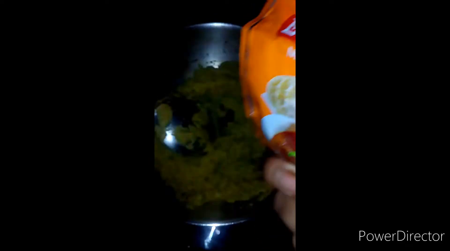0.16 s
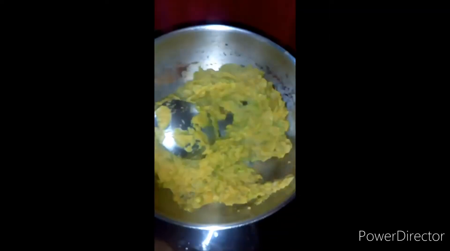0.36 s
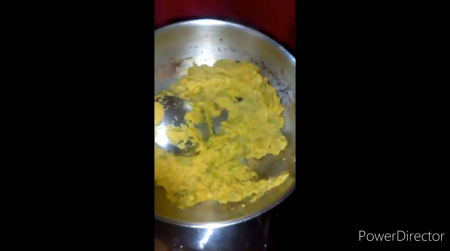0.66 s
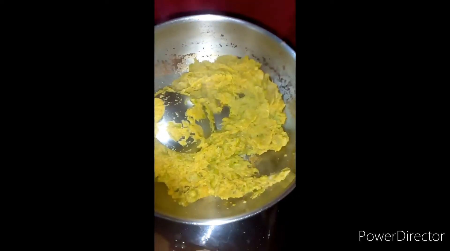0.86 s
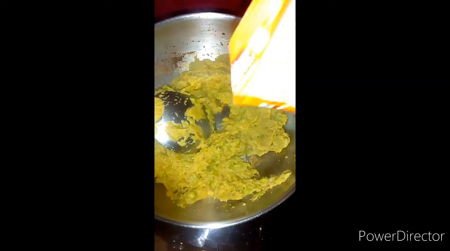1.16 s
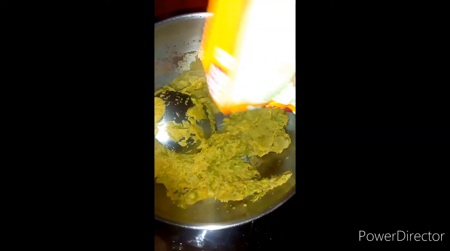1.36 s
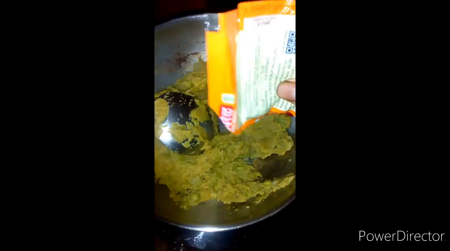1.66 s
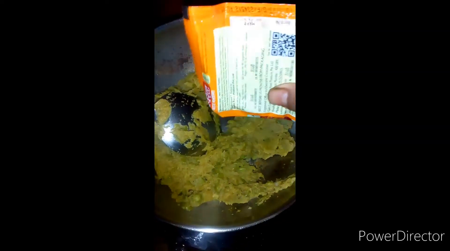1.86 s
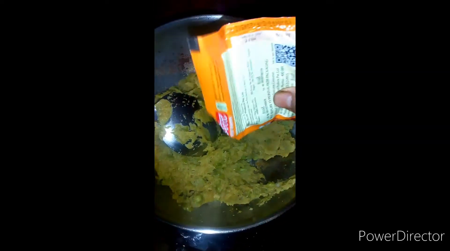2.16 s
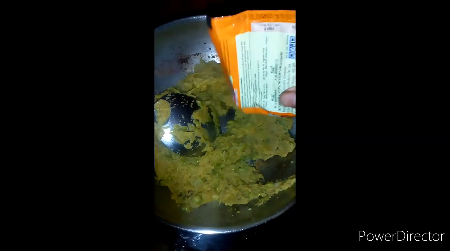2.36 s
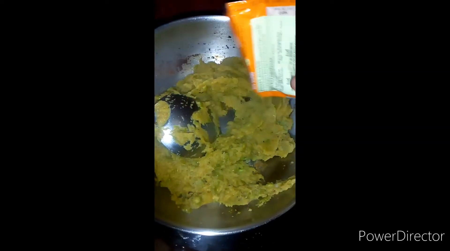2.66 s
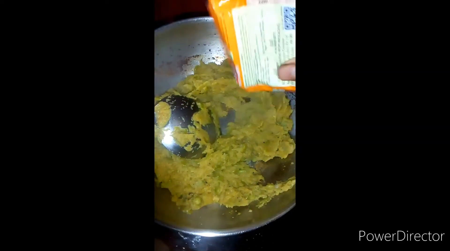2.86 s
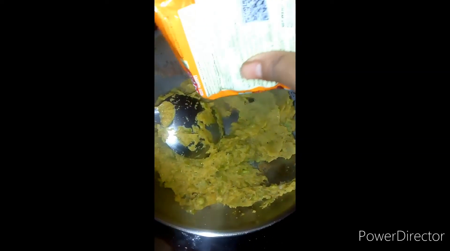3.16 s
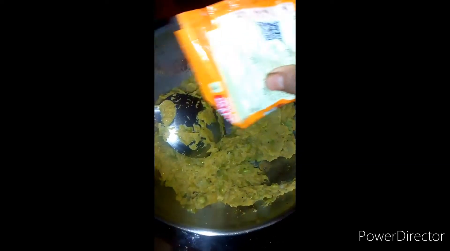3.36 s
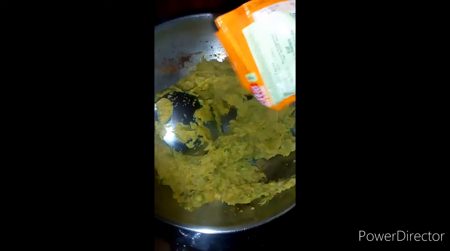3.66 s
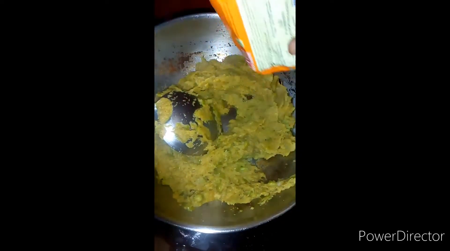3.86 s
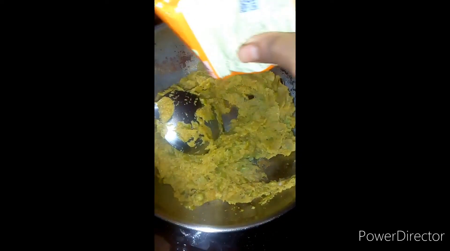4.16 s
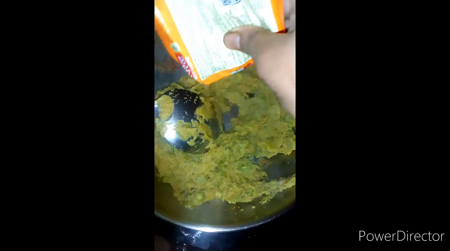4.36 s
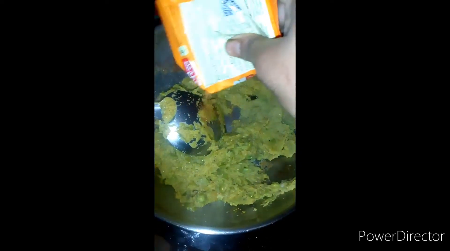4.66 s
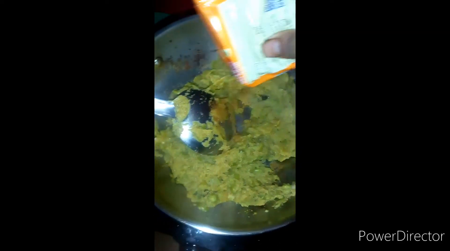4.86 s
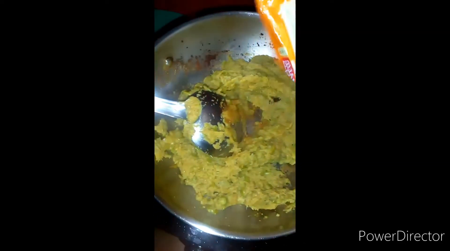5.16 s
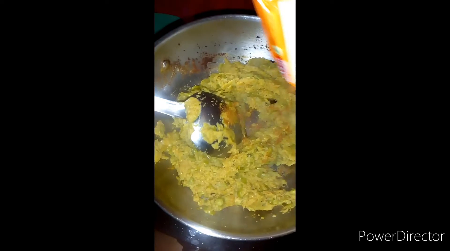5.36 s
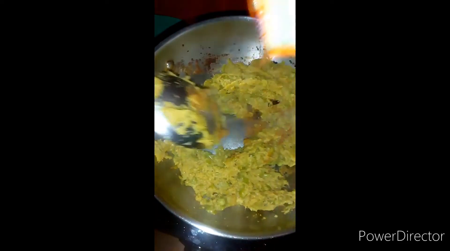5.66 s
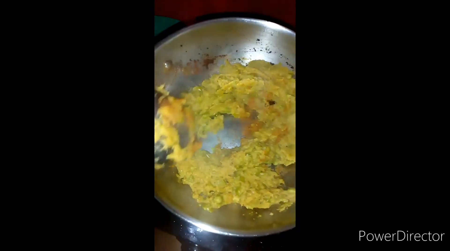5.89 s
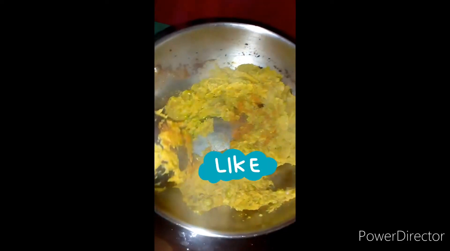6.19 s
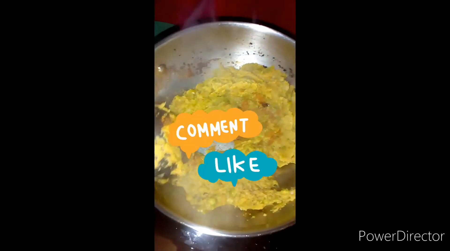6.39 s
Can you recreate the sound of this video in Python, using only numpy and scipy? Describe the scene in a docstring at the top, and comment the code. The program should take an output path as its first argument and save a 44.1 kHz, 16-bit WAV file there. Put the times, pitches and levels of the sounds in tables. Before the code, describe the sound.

Soft sizzling in a kitchen, then sharp bursts of crackling foil as a packet is jerked about five or six times a second.

```python
"""A kitchen, close on a foil spice packet over a steel pan, taken in stereo on a phone.
From the start paste sizzles softly as hiss and bubble pops, and a faint far sine tone comes and goes.
First come soft handling and lone crease snaps; then the packet is shaken about six times a second.
Each shake buckles the foil: ringing creases snap, noisy walls drum, powder thuds, crinkle fills the gaps.
Pan and room throw the sounds back as random echoes; after the last stray snaps the sizzle sinks."""
import sys
import numpy as np
from scipy import signal
from scipy.fft import rfft, irfft, next_fast_len
from scipy.io import wavfile

SR = 44100
rng = np.random.default_rng(int(sys.argv[2]) if len(sys.argv) > 2 else 0)


def to_wav(sig):
    """Store sig (one row per channel, or 1-D mono) as 16-bit WAV at the path in sys.argv[1].

    Samples outside -1..1 are clipped; the rate is SR.
    """
    pcm = np.clip(np.atleast_2d(sig), -1, 1) * 32767
    pcm = np.round(pcm).astype(np.int16)
    wavfile.write(sys.argv[1], SR, pcm.T)  # frames by channels


N = 287961
T = np.arange(N) / SR  # time axis (s)
TOP_HZ = 15900  # upper limit of the recorded band
GRAIN, LEAD = 768, 128  # length of one short sound, and room for its forerunners (samples)
REST_STRAIN_DB = -36.5  # strain that the grip alone keeps in the foil

# faint far tone: start_s, end_s, pitch_hz, level_db
FAR_TONES = [(0, 0.67, 444, -67), (2.8, 6.1, 450.2, -65), (6.129, 6.28, 445, -61.5)]
# swell and sinking of the sizzle, before its quick wavering: time_s, level_db
SIZZLE_LEVEL = [(0, -51.5), (.5, -50.5), (.9, -50.5), (2.7, -51), (4, -50), (5.6, -47), (6.15, -51.5),
                (6.5, -52)]
# colour of the sizzle: frequency_hz, gain_db
SIZZLE_COLOUR = [(30, -5), (120, -3.5), (500, -7.5), (1300, -6), (2800, -3), (5500, 6), (8000, -2.5),
                 (10500, -1.5), (15500, -8.5)]
# shading of the left microphone by the phone's body: frequency_hz, gain_db
PHONE_SHADE = [(700, -3.5), (1300, -11.5), (2200, -2.5), (4400, -7), (8000, -9.5), (15000, -17)]
# hollow knocks of the whole packet as the powder shifts: start_s, pitch_hz, level_db
POWDER_KNOCKS = [(1.198, 327, -38), (1.29, 274, -33.5), (1.734, 257, -31), (2.2, 710, -29),
                 (2.345, 800, -31.5), (2.524, 686.6, -33), (2.583, 714, -30.5), (3.618, 233.7, -36),
                 (4.053, 243.1, -26.5), (4.418, 275.7, -33.5), (5.515, 85.16, -40), (5.603, 150.5, -37)]
# soft handling of the packet outside the shakes: start_s, end_s, crinkle_level_db (before trim)
SOFT_HANDLING = [(.005, 0.086, -51.5), (0.346, .4, -56), (.68, .73, -54.5), (.98, 1.059, -47.5),
                 (1.455, 1.5, -45), (4.6, 4.65, -42.5), (5.38, 5.44, -42), (5.8, 5.83, -41),
                 (5.99, 6.08, -46)]
# shakes of the packet, levels before trim: start_s, end_s, crinkle_level_db, crease_level_db
PACKET_SHAKES = [(1.2828, 1.365, -38, -28), (1.5103, 1.5359, -43, -23), (1.707, 1.794, -37, -23),
                 (1.9378, 2.0114, -33.5, -24), (2.1601, 2.2282, -36.5, -23.5),
                 (2.3493, 2.374, -31.5, -21.5), (2.499, 2.554, -35.5, -26), (2.654, 2.7026, -32.5, -28.5),
                 (2.8114, 2.8755, -35.5, -24), (2.9463, 2.9987, -31, -25.5), (3.104, 3.1563, -30.5, -22.5),
                 (3.2533, 3.308, -27, -23), (3.4378, 3.4667, -27.5, -23), (3.6039, 3.655, -29.5, -25),
                 (3.7456, 3.8009, -32.5, -22.5), (3.8974, 3.969, -32, -27), (4.04, 4.122, -31, -27),
                 (4.1935, 4.2588, -27, -23), (4.376, 4.4352, -31.5, -30.5), (4.534, 4.5943, -33, -23),
                 (4.7335, 4.8141, -30.5, -22), (4.926, 4.9676, -26.5, -22.5), (5.122, 5.1922, -31.5, -23),
                 (5.2706, 5.336, -28.5, -21.5), (5.4648, 5.5105, -32, -25), (5.5777, 5.651, -35, -23),
                 (5.741, 5.7897, -33, -22.5), (5.879, 5.92, -42, -22)]
# creases that stand out, alone or within a shake, levels before trim:
# start_s, snap_level_db, ring_pitch_hz, wall_level_db
CREASE_SNAPS = [(.335, -30.5, 10700, -63), (.3462, -32.5, 10100, -70), (.677, -32, 3920, -54),
                (.6888, -35.5, 2790, -63), (.86, -40.5, 6000, -46), (.982, -40, 4300, -47),
                (1.0088, -36, 10800, -58), (1.088, -33, 3200, -34.5), (1.2014, -31, 2840, -35.5),
                (1.2578, -29.5, 6570, -48), (1.2936, -26.5, 5370, -31.5), (1.3505, -26, 3470, -29),
                (1.418, -39, 3700, -34.5), (1.4844, -45, 4800, -37), (1.526, -22, 5330, -28.5),
                (1.7386, -27, 4030, -39), (1.8959, -32, 3840, -32.5), (1.9776, -23, 4600, -21.5),
                (2.1771, -25, 4756, -25), (2.329, -33.5, 4587, -40), (2.5304, -27, 4363, -24),
                (2.6716, -23, 2420, -24.5), (2.8284, -22.5, 6250, -28), (2.8373, -21, 3750, -48),
                (2.9745, -22.5, 6270, -34.5), (3.1134, -18.5, 5098, -24.5), (3.181, -20.5, 4298, -47),
                (3.291, -22, 4724, -30.5), (3.4553, -20, 3969, -22.5), (3.618, -19.5, 4780, -25.5),
                (3.6912, -20, 4632, -56), (3.7674, -17.5, 5412, -30.5), (3.929, -25, 4106, -32.5),
                (4.0736, -21, 4358, -29), (4.209, -22.5, 5282, -27.5), (4.3877, -15, 4662, -35),
                (4.4201, -18.5, 5103, -31.5), (4.4581, -24, 5164, -33), (4.579, -19, 4332, -31),
                (4.644, -31.5, 3971, -35.5), (4.7483, -20.5, 4970, -62), (4.9558, -17, 5186, -31),
                (5.019, -23.5, 4904, -37.5), (5.0763, -33.5, 3595, -41.5), (5.1345, -20, 4899, -38),
                (5.3034, -19.5, 5608, -34), (5.325, -17, 5103, -39), (5.395, -34.5, 5005, -37),
                (5.48, -20.5, 4178, -49), (5.6084, -19, 5302, -26), (6.0102, -30, 4750, -38),
                (6.0633, -29, 3260, -55), (6.0711, -21.5, 5120, -32.5)]
# drumming of the walls against the snap, varying over the take: time_s, level_db
WALL_BALANCE = [(1.3, -7.5), (2.3, -4.5), (3.3, -9.5), (4.6, -13), (5.9, -7.5)]
# colour of a crease's crack: frequency_hz, gain_db
CRACK_COLOUR = [(1500, -25.5), (3000, -8.5), (5500, 2.5), (8000, -7), (10500, -5), (15500, -15.5)]
# colour of the drumming walls: frequency_hz, gain_db
WALL_COLOUR = [(60, -17.5), (240, -6.5), (450, -8), (800, 0.5), (1350, -2), (2050, 8.5), (2900, -3.5),
               (6000, -18)]


def undb(db):
    """Decibels to gain."""
    return 10 ** (np.asarray(db) / 20)


def unit(x):
    """Scale each row to an energy of one."""
    return x / np.sqrt(np.sum(x ** 2, axis=-1, keepdims=True))


def colour(x, points):
    """Causal, minimum-phase filter through (Hz, dB) points, along the last axis."""
    size = 2 * next_fast_len(x.shape[-1])
    hz, db = np.transpose(points)
    freqs = np.maximum(np.fft.rfftfreq(size, 1 / SR), 1)
    gain = undb(np.interp(np.log(freqs), np.log(hz), db))
    # folding the cepstrum onto positive time makes the filter causal
    cepstrum = irfft(np.log(gain))
    cepstrum[1:size // 2] *= 2
    cepstrum[size // 2 + 1:] = 0
    response = np.exp(rfft(cepstrum))
    return irfft(rfft(x, size) * response)[..., :x.shape[-1]]


def later(x, size):
    """Delay by a whole number of samples."""
    return np.roll(x, size, axis=-1) * (np.arange(x.shape[-1]) >= size)


def place(times, grains):
    """Sum short sounds (one set for each channel, or just one) into tracks at their times."""
    first = (np.maximum(times, 0) * SR).astype(int)
    at = first[:, None] + np.arange(GRAIN)
    return np.array([np.bincount(at.ravel(), g, N)[:N] for g in grains.reshape(-1, at.size)])


def bursts(count, decay_s):
    """Rows of noise that die away at once."""
    return rng.standard_normal((count, GRAIN)) * np.exp(-np.arange(GRAIN) / SR / decay_s)


def scatter(grains, rise_s, fall_s):
    """Smear each sound by its own random cloud of tiny forerunners and echoes."""
    t = (np.arange(GRAIN // 2) - LEAD) / SR
    envelope = np.exp(np.minimum(t / rise_s, -t / fall_s))
    cloud = unit(rng.standard_normal((len(grains), len(t))) * envelope)
    return signal.fftconvolve(grains, cloud, axes=1)[:, :GRAIN]


def facing(x):
    """A low sound reaches the left microphone later and in opposite polarity."""
    return np.array([-later(x, size=18), x])


def far_tone(fade_s=.025):
    """A faint, pure tone far off comes and goes as a sine with short fades."""
    tone = np.zeros(N)
    for start, end, hz, db in FAR_TONES:
        fade = np.clip(np.minimum(T - start, end - T) / fade_s, 0, 1)
        tone += undb(db) * np.sin(2 * np.pi * hz * T) * fade
    return tone


def kitchen(x, room_db, dull_hz, t60_s=0.36):
    """The room's dull tail: decaying, low-passed noise answers the sound after 5 ms."""
    t = T[:SR // 2]
    decay = undb(-60 * t / t60_s) * (t > .005)
    tail = unit(rng.standard_normal(len(t)) * decay)
    dulling = signal.butter(1, min(dull_hz, TOP_HZ), fs=SR, output="sos")
    tail = signal.sosfilt(dulling, tail)
    return undb(room_db) * signal.fftconvolve(x, tail)[:N]


def sizzle(count=900, pop_db=-6.5, scatter_db=6.4):
    """Moist paste on hot steel: a wavering hiss with tiny, bright bursting bubbles."""
    when, chance = rng.random((count, 2)).T
    sizes = undb(scatter_db * np.minimum(-np.log(1 - chance), 4))
    # the slope of a noise burst is brighter than the burst itself
    bubbles = unit(np.gradient(bursts(count, 0.00022), axis=1))
    pops = place(when * N / SR, bubbles * sizes[:, None])[0]
    steps = count // 10
    waver_db = np.interp(T, np.linspace(0, T[-1], steps), rng.standard_normal(steps))
    level_db = np.interp(T, *np.transpose(SIZZLE_LEVEL)) + waver_db
    hiss = unit(rng.standard_normal(N)) + undb(pop_db) * unit(pops)
    return np.sqrt(N) * unit(colour(hiss, SIZZLE_COLOUR)) * undb(level_db)


def knocks(decay_s=0.0027, swell_s=0.0019):
    """The powder shifts and the air-filled packet thuds: three well damped drum modes."""
    out = np.zeros(N)
    t = T[:SR // 10]
    shape = np.exp(-t / decay_s) * (1 - np.exp(-t / swell_s))
    drum_modes = np.array([1, 1.59, 2.14])  # pitch ratios
    for start, hz, db in POWDER_KNOCKS:
        modes = np.sin(2 * np.pi * hz * drum_modes[:, None] * t)
        thud = drum_modes ** -2 @ modes  # higher modes are weaker
        out[int(start * SR):][:len(t)] += undb(db) * shape / shape.max() * thud
    return facing(out)


def buckle(times, snap_db, ring_hz, wall_db, cycles=1.6, crack_db=-2.0, crack_s=0.00039,
           wall_s=0.0016, cloud_db=-1, chain_db=7, left_db=-4):
    """A crease flips: a crack and a few cycles of ring, then the slack walls drum. Returns left and right."""
    count = len(times)
    turns = np.minimum(ring_hz, TOP_HZ)[:, None] * np.arange(GRAIN) / SR
    ring = unit(np.sin(2 * np.pi * turns) * np.exp(-turns / cycles) * (1 - np.exp(-2 * turns)))
    crack = unit(colour(bursts(count, crack_s), CRACK_COLOUR))
    snap = unit(ring + undb(crack_db) * crack)
    walls = unit(colour(bursts(count, wall_s), WALL_COLOUR))
    span = .003 * SR  # levels refer to the energy of a 3 ms sound
    snap_size, wall_size = np.sqrt(span) * undb([snap_db, wall_db])[:, :, None]
    # the more the walls move, the more neighbouring creases go off too; a lone crease stays crisp
    neighbour_gain = undb(chain_db + 0.68 * (wall_db - snap_db))[:, None]
    neighbours = neighbour_gain * scatter(snap, rise_s=0.00084, fall_s=0.0017)
    snap = snap_size * unit(later(snap, size=LEAD) + neighbours)
    # the moving packet meets new echoes from the pan each time
    echoes = undb(cloud_db) * scatter(walls, rise_s=0.0017, fall_s=0.0026)
    walls = wall_size * unit(later(walls, size=LEAD) + echoes)
    right = snap + walls
    # the left microphone is later, opposite in polarity, and hears the treble mostly by detours
    detour = np.roll(scatter(snap + .5 * walls, rise_s=0.00017, fall_s=0.0077), -LEAD, axis=1)
    direct = later(walls + 0.028 * snap, size=18)
    left = undb(left_db) * later(detour, size=22) - direct
    return place(times - LEAD / SR, np.array([left, right]))


def flexing(count=170, lead_s=0.015, below_db=-18, scatter_db=4, wall_db=3.5, ring_hz=4300):
    """As the hand winds up for a jerk, the powder shifts and the slack walls flex with soft, dull ticks."""
    start, _, db, _ = np.transpose(PACKET_SHAKES)[:, np.arange(count) % len(PACKET_SHAKES)]
    when, size, pitch = rng.standard_normal((count, 3)).T
    size_db = db + below_db + scatter_db * np.minimum(size, 2)
    times = start - lead_s * np.abs(when)
    return buckle(times, size_db, ring_hz * np.exp(.3 * pitch), size_db + wall_db)


def settling(count=260, lag_s=0.039, below_db=-13.5, scatter_db=5, wall_db=-4, ring_hz=4400):
    """After each jerk the foil relaxes with tiny ticks."""
    _, end, db, _ = np.transpose(PACKET_SHAKES)[:, np.arange(count) % len(PACKET_SHAKES)]
    when, size, pitch = rng.standard_normal((count, 3)).T
    size_db = db + below_db + scatter_db * np.minimum(size, 2)
    times = end + lag_s * np.abs(when)
    return buckle(times, size_db, ring_hz * np.exp(.3 * pitch), size_db + wall_db)


def crinkle(big, per_s=380, scatter_db=3.0, snap_db=-0.5, wall_db=-7, ring_hz=4700, ring_spread=0.34,
            crowd_s=0.012, crowding=0.76, lead_s=.001, trail_s=.005):
    """Many small creases give way while the packet is moved, strongest close to the big buckles."""
    snap_s, _, _, body_db = big.T
    rows = []
    for start, end, db, *_ in [*SOFT_HANDLING, *PACKET_SHAKES]:
        start, end = start - lead_s, end + trail_s
        count = max(int(per_s * (end - start)), 1)
        when, size, pitch, body = rng.standard_normal((count, 4)).T
        times = np.linspace(start, end, count) + when / per_s
        nearness = np.exp(-np.abs(times[:, None] - snap_s) / crowd_s)
        strain = nearness @ undb(body_db) ** 2 + undb(REST_STRAIN_DB) ** 2
        size_db = scatter_db * size + crowding * 10 * np.log10(strain)
        # hold the mean power of each movement at its table level
        size_db = db + size_db - 10 * np.log10(np.mean(undb(size_db) ** 2))
        pitch_hz = ring_hz * np.exp(ring_spread * pitch)
        rows.append([times, size_db + snap_db, pitch_hz, size_db + wall_db + 2 * body])
    return buckle(*np.hstack(rows))


def creases(per_s=45, jitter=.3, scatter_db=1.0, jerk_db=-0.5, between_db=-2.5, ring_hz=4800, ring_spread=.18):
    """A crease snaps as each shake starts, another as it stops, and any others at random between.
    Returns these and the lone snaps as rows of start_s, snap_db, ring_hz, wall_db."""
    rows = [CREASE_SNAPS]
    chances = rng.standard_normal((len(PACKET_SHAKES), 20, 3))
    for (start, end, _, db), chance in zip(PACKET_SHAKES, chances):
        count = int(np.clip(1 + np.round(per_s * (end - start)), 2, 20))
        when, size, pitch = chance[:count].T
        times = np.linspace(start, end, count)
        times[1:-1] += jitter * when[1:-1] / per_s
        level_db = np.full(count, float(db))
        level_db[0] += jerk_db
        level_db[1:-1] += between_db + scatter_db * size[1:-1]
        wall_db = level_db + np.interp(times, *np.transpose(WALL_BALANCE))
        pitch_hz = ring_hz * np.exp(ring_spread * pitch)
        rows.append(np.transpose([times, level_db, pitch_hz, wall_db]))
    return np.vstack(rows)


def snaps(big, snap_db=1.0, wall_db=2.0):
    """The loud creases, lone or in a shake, buckle with trims on snap and walls."""
    start_s, level_db, ring_hz, body_db = big.T
    return buckle(start_s, level_db + snap_db, ring_hz, body_db + wall_db)


def scene():
    """The right microphone faces the packet; the left lies in the phone's shadow and hears more of the room."""
    big = creases()
    shaded, foil = flexing() + snaps(big) + crinkle(big) + settling() + knocks()
    right = foil + kitchen(foil, room_db=-15.5, dull_hz=7240) + sizzle()
    left = colour(shaded + sizzle(), PHONE_SHADE) + kitchen(foil, room_db=-12, dull_hz=2950)
    return np.array([left, right]) + facing(far_tone())


def record(dry):
    """The phone thins the deep bass and cuts the top steeply."""
    bass_cut = signal.butter(1, 50, "high", fs=SR, output="sos")
    top_cut = signal.ellip(10, .2, 80, TOP_HZ, fs=SR, output="sos")
    return signal.sosfilt(top_cut, signal.sosfilt(bass_cut, dry))


dry = scene()
out = record(dry)
to_wav(out)
```